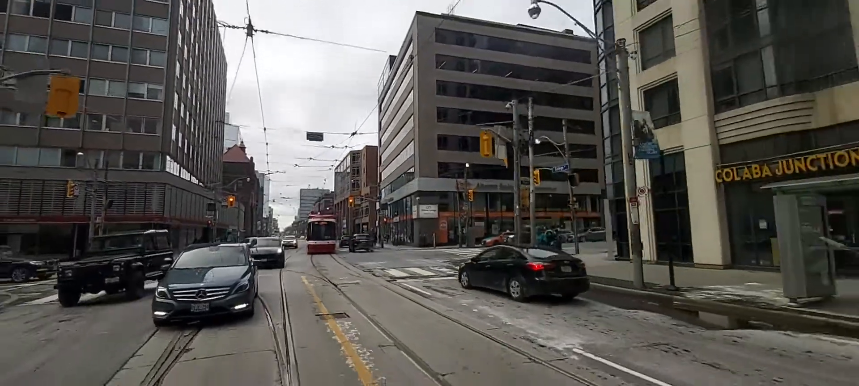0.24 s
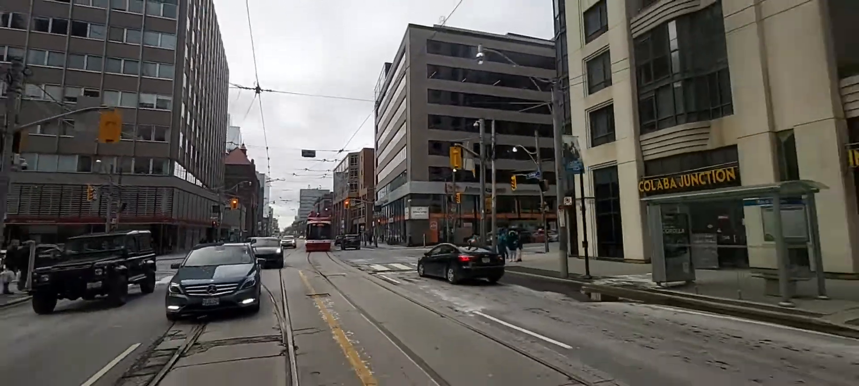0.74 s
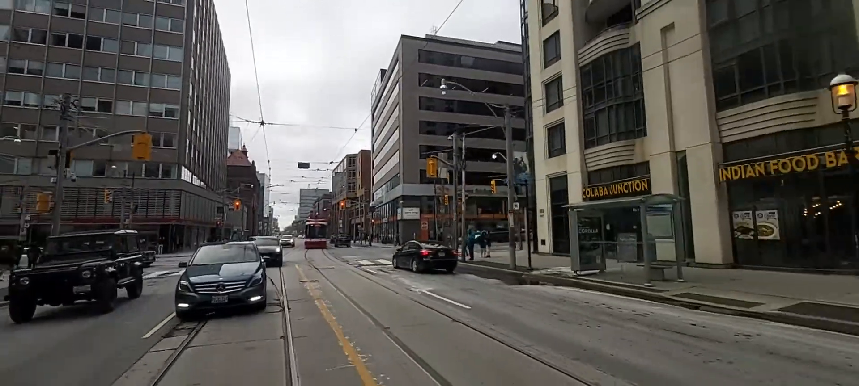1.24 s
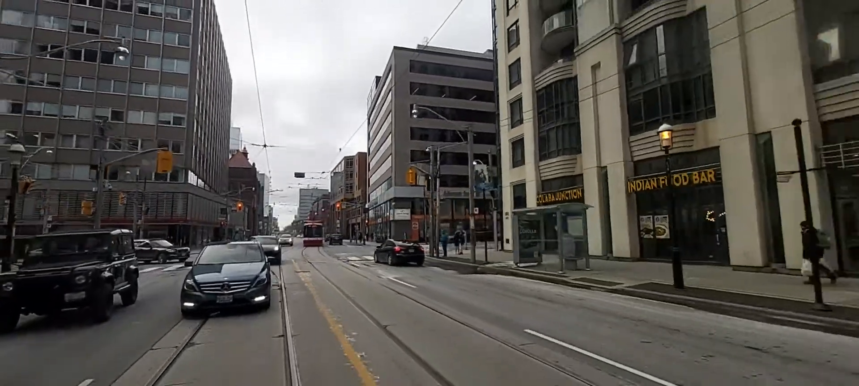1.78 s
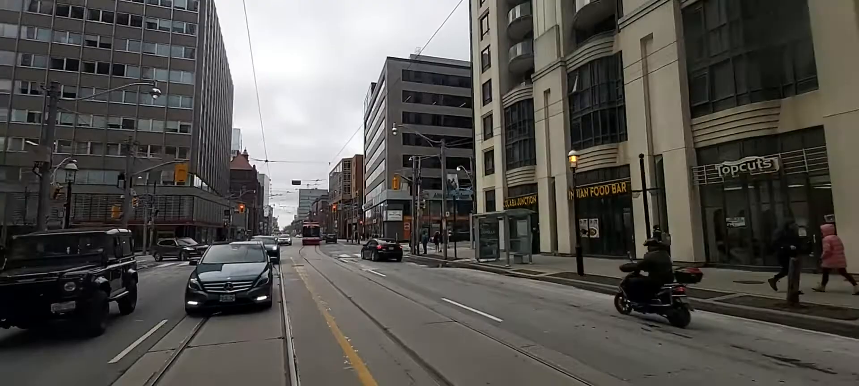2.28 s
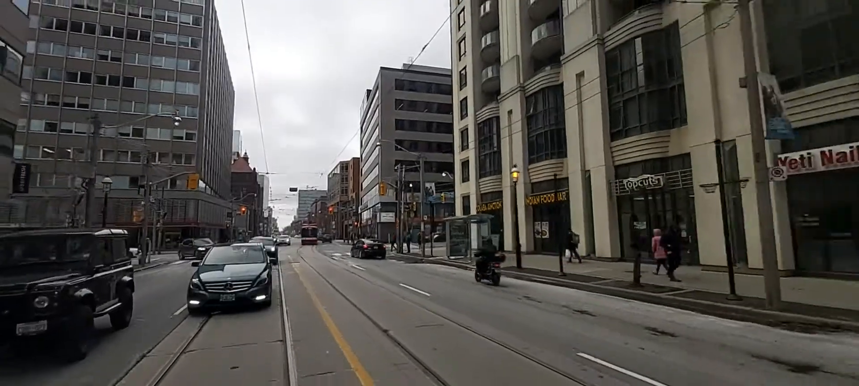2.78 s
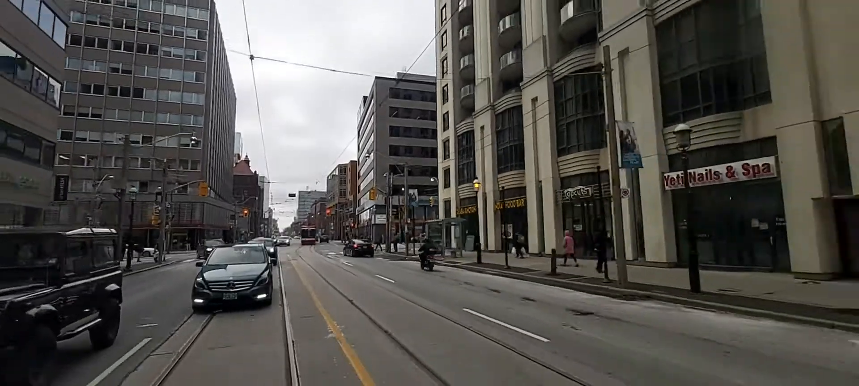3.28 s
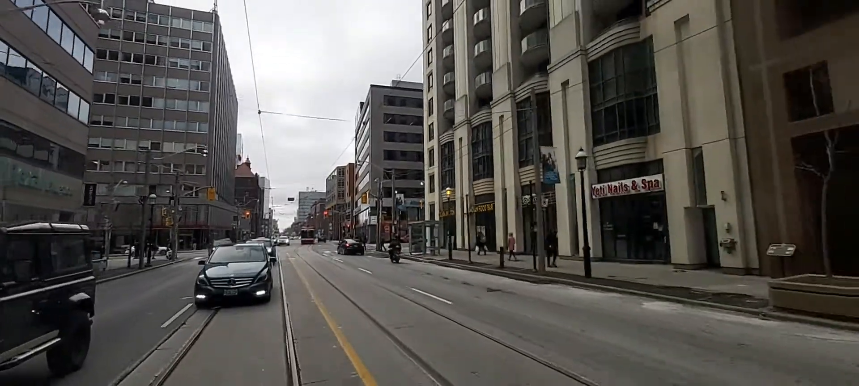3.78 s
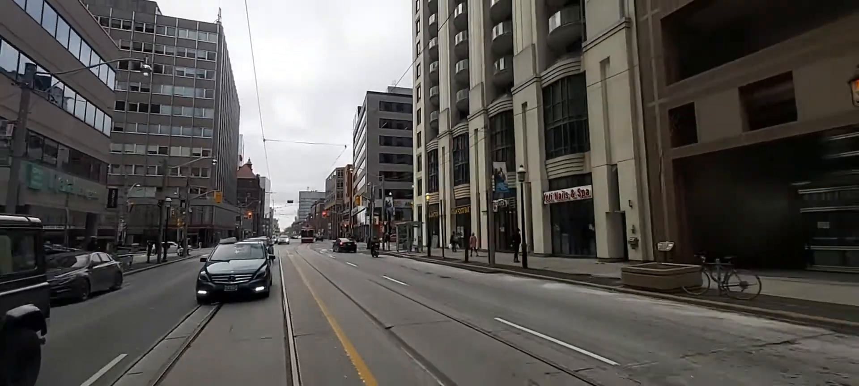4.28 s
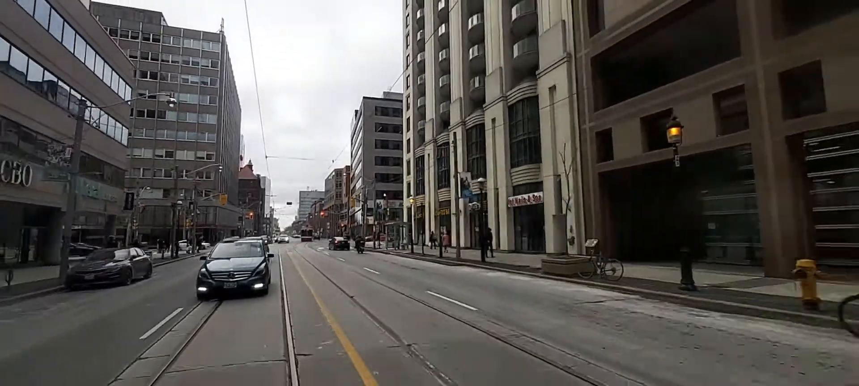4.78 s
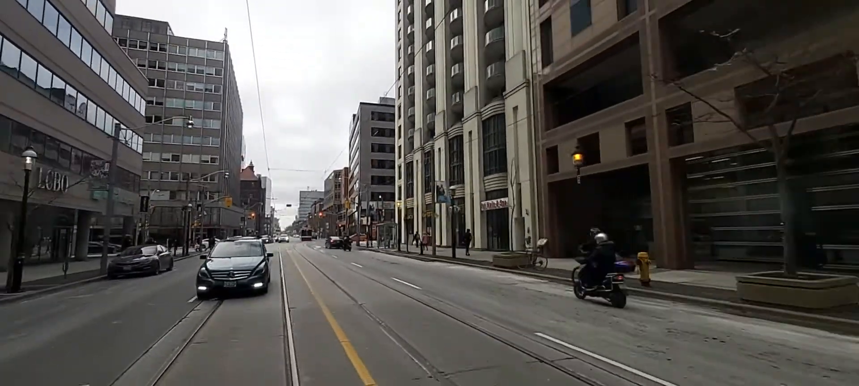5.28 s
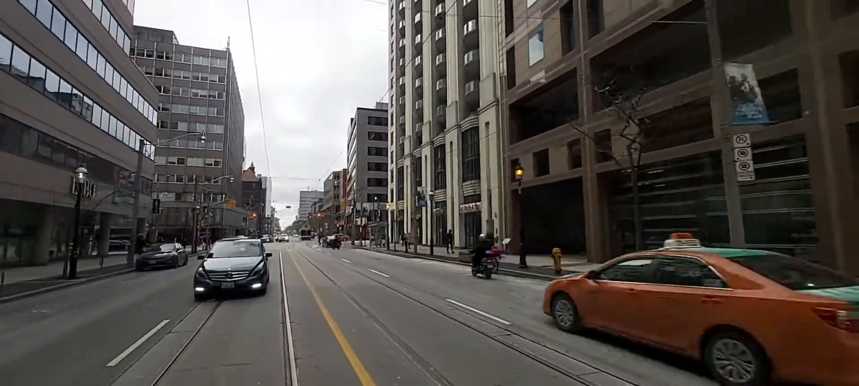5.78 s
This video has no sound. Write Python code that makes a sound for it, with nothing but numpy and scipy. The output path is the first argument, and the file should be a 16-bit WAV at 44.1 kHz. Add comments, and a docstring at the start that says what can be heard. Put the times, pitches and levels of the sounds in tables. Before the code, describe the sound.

Inside a rolling streetcar, a deep floor rumble and dull roar continue while wheels thump heavily over rail joints and loose fittings rattle.

```python
"""Inside a rolling streetcar

In the cabin, two spaced microphones: resonant noise is the bogie and floor booming with wheel-rail roughness.
Gliding tones make rail-joint thumps and bogie bounces; noise bursts make loose panels and fittings rattle.
Behind lie a banded-noise roar, swelling air hiss, a converter's tone and one faint rising wheel squeal."""
import sys
import numpy as np
from scipy import signal
from scipy.fft import next_fast_len
from scipy.io import wavfile
from scipy.ndimage import uniform_filter1d, minimum_filter1d

SR = 44100
rng = np.random.default_rng(int(sys.argv[2]) if len(sys.argv) > 2 else 0)


def materialize(psi):
    """Save the field psi as 16-bit PCM at rate SR to the path in sys.argv[1].

    A 1-D psi becomes a single channel; in a 2-D psi each row is a channel.
    """
    bounded = np.clip(np.atleast_2d(psi).T, -1, 1)
    quanta = np.round(bounded * 32767).astype(np.int16)
    wavfile.write(sys.argv[1], SR, quanta)


N = 266364   # samples

# Boom underfoot over time: [t/s, bogie level/dB, floor level/dB]
BODY_SHAKING = [(0.0, -27, -30), (0.43, -29.5, -33.5), (0.75, -32, -35.5), (0.82, -14, -26),
                (0.97, -19.5, -29), (1.24, -19.5, -29), (1.41, -30.5, -25.5), (2.02, -27, -33.5),
                (2.3, -25.5, -34.5), (2.64, -18.5, -30.5), (3.13, -23, -28), (3.55, -27.5, -31.5),
                (3.82, -18, -20), (3.99, -21.5, -21), (4.41, -27, -32.5), (4.63, -29.5, -30.5),
                (4.98, -37, -29.5), (5.43, -29, -25.5), (6.04, -35, -35)]
# Lowest bogie resonances: [f/Hz, width/Hz, relative level/dB]
BOGIE_MODES = [(37.8, 91, -10), (49.7, 29.6, -3.5), (62.7, 47.6, -0.5), (78.5, 93, -7.5)]
# Lowest floor resonances: [f/Hz, width/Hz, relative level/dB]
FLOOR_MODES = [(107.4, 15.1, -6), (129.6, 15.4, -10)]
JOINT_DIP_DB = -1


def rumble():
    """Rail roughness keeps bogie and floor ringing; the floor's share dips while a wheel crosses a joint."""
    bogie_db, floor_db = in_time(BODY_SHAKING)
    crossing = 0
    for s, _, _, rise_s, hold_s, *_ in JOINT_THUMPS:
        crossing = crossing + blow(s - .03, rise_s, t60=0.42, hold_s=hold_s + 0.026)
    floor_db = floor_db + JOINT_DIP_DB * np.minimum(crossing, 1)
    bogie = amp(bogie_db) * evened(resonant_noise(BOGIE_MODES), share=0.57)
    floor = amp(floor_db) * evened(resonant_noise(FLOOR_MODES), share=0.29)
    return bogie + floor


# Wheels over rail joints, under the floor:
# [t/s, floor level/dB, floor f/Hz, build-up/s, hold/s, panel level/dB, steel level/dB]
JOINT_THUMPS = [(0.048, -21, 107.6, 0.073, .005, -43, -70), (0.784, -9.5, 105, 0.016, 0.0055, -33, -44),
                (0.806, -5, 115, 0.02, 0.0092, -22, -39), (1.074, -9.5, 104.8, 0.024, 0.031, -23.5, -39.5),
                (1.139, -27, 109, 0.011, 0.038, -29, -44), (2.474, -16.5, 115, 0.012, 0.0065, -29.5, -36),
                (2.501, -11.5, 111, 0.017, .015, -26.5, -42), (2.532, -16, 104, 0.023, 0.0086, -41, -63),
                (2.712, -7.5, 104, 0.037, 0.0086, -32.5, -47), (2.736, -10.5, 105, 0.016, .005, -40, -39),
                (2.767, -12.5, 104, 0.018, 0.011, -29.5, -36),
                (3.218, -15.5, 104.6, 0.055, 0.014, -35, -42), (3.597, -12, 104.4, 0.012, 0.045, -49, -49),
                (3.67, -10.5, 117.5, 0.035, 0.012, -48, -59), (3.699, -15, 127, 0.015, 0.014, -25.5, -31.5),
                (3.729, -10, 135, 0.016, 0.0055, -26.5, -42), (3.841, -9, 108, 0.036, 0.013, -25.5, -40),
                (3.94, -12, 120.3, 0.021, 0.034, -28.5, -40), (3.976, -22, 108, 0.015, .005, -27, -43.5),
                (4.152, -15.5, 93.4, 0.028, 0.013, -56, -59), (5.226, -17.5, 94, 0.056, 0.009, -37, -41.5),
                (5.384, -18, 102, 0.035, 0.0058, -55, -65), (5.498, -17.5, 109, 0.056, 0.039, -41, -44),
                (5.638, -34, 95, 0.022, .005, -59, -45), (5.821, -18, 114, 0.053, 0.0061, -35.5, -41)]
# Body panel resonances: [f/Hz, width/Hz, relative level/dB]
PANEL_MODES = [(164.8, 58, 2), (230.3, 27.5, 7), (288.4, 29, 3.5), (333.6, 24, -6.5), (370, 54, -10)]
# Steel resonances: [f/Hz, width/Hz, relative level/dB]
STEEL_MODES = [(517, 71, 5), (672, 110, 8.5), (876, 140, -8), (963, 150, 5.5), (1105, 110, 11.5),
               (1243, 50, 4.5), (1455, 45, -7.5), (1630, 310, -18)]
FLOOR_SAG_HZ_PER_S, FLOOR_T60_S = -60, .085


def thumps(rail):
    """Each joint swings the floor for a few cycles, strikes panels and steel, and leaves both shuddering."""
    floor, strikes, shudder, clank = 0, 0, 0, 0
    for s, floor_level_db, hz, rise_s, hold_s, panel_db, steel_db in JOINT_THUMPS:
        push = blow(s - .015, rise_s, FLOOR_T60_S, hold_s)
        floor = floor + amp(floor_level_db) * swing(s, hz, FLOOR_SAG_HZ_PER_S, push).imag
        strikes = strikes + amp(panel_db) * struck(PANEL_MODES, s - .01, rise_s=1.15 * rise_s)
        strikes = strikes + amp(steel_db - 6.0) * struck(STEEL_MODES, s - .004, rise_s=.014)
        shudder = shudder + amp(panel_db) * blow(s - .01, rise_s=0.023, t60=0.6)
        clank = clank + amp(steel_db) * blow(s - .008, rise_s=0.013, t60=0.48)
    panels = evened(resonant_noise(PANEL_MODES), share=0.63)
    steel = evened(resonant_noise(STEEL_MODES), share=0.37)
    ringing = shudder * panels + clank * (steel + amp(-2) * rail)
    return two_ears(floor * np.sqrt(2), 0, 87) + amp(-3.0) * strikes + ringing


# Bogie bouncing on its springs, under the floor: [t/s, level/dB, starting f/Hz]
SPRING_BOUNCES = [(0.776, -23, 59.6), (0.845, -15, 56.6), (0.92, -23, 62), (1.101, -13, 52.5),
                  (1.319, -17.5, 65.1), (1.618, -20, 57.8), (2.341, -23.5, 56.8), (2.51, -14, 55.2),
                  (2.759, -15.5, 50.9), (2.999, -19, 55.5), (3.251, -23.5, 53.6), (3.358, -20, 59.1),
                  (3.719, -14.5, 53.3), (3.98, -15, 62.5), (4.359, -25, 63), (5.239, -22.5, 61.6),
                  (5.47, -19, 63.5), (5.601, -21.5, 61.2)]
BOUNCE_RISE_S, BOUNCE_T60_S, BOUNCE_CLIMB_HZ_PER_S = 0.019, 0.95, 45.7


def bounces():
    """Each bounce on the springs is a deep swing that climbs in pitch as it settles."""
    heave = 0
    for s, level_db, hz in SPRING_BOUNCES:
        envelope = blow(s, BOUNCE_RISE_S, BOUNCE_T60_S)
        heave = heave + amp(level_db) * swing(s, hz, BOUNCE_CLIMB_HZ_PER_S, envelope, turn=rng.random())
    heave = heave * np.sqrt(2)
    return two_ears(heave.imag, heave.real, 85)


# Loose fittings knocking in the cabin: [t/s, knock and clatter level/dB, top sizzle level/dB, build-up/s]
FITTING_KNOCKS = [(0.0194, -43, -71, .003), (0.3022, -37.5, -72, 0.0027), (0.35, -41, -65, .012),
                  (0.7901, -31, -66, 0.0097), (0.848, -32.5, -56, 0.0041), (0.919, -36, -79, 0.0027),
                  (1.049, -36.5, -68, .006), (1.0984, -35, -69, 0.0094), (1.145, -27.5, -47.5, 0.0031),
                  (1.2181, -35, -64, 0.0025), (1.245, -43, -56, .008), (1.271, -33.5, -54, .002),
                  (1.295, -48, -61, .008), (1.348, -40.5, -75, .003), (1.6844, -38, -56, 0.0057),
                  (1.95, -44, -60, 0.011), (2.0701, -37, -73, .015), (2.2437, -34.5, -69, 0.0043),
                  (2.2578, -48, -59, .006), (2.3542, -43, -55, 0.011), (2.3695, -46, -70, .003),
                  (2.489, -32, -57, .002), (2.551, -27.5, -49.5, 0.0018), (2.763, -35, -57, 0.0043),
                  (2.776, -34.5, -58, 0.0027), (2.791, -38, -62, 0.0029), (2.85, -44, -77, 0.01),
                  (3.08, -39.5, -61, .01), (3.117, -39, -60, 0.0052), (3.3005, -39, -67.5, 0.0074),
                  (3.5625, -39.5, -61, 0.0037), (3.741, -34.5, -58, .003), (3.815, -34.5, -59.5, 0.0055),
                  (3.8815, -35.5, -56, 0.004), (3.905, -54, -62, .008), (3.9924, -34, -61.5, 0.0039),
                  (4.0461, -38, -65, .003), (4.094, -57, -66, 0.0022), (5.475, -32, -61, 0.0045),
                  (5.609, -31.5, -54, 0.0049), (5.63, -44, -59, 0.0075), (5.7476, -39, -67, 0.0055)]
# First ring of a knock: [f/Hz, width/Hz, relative level/dB]
TICK_MODES = [(2450, 640, -0.5), (3320, 240, -9.5), (4800, 550, -2), (6460, 940, 1), (7600, 900, -7.5)]
# Clatter spectrum: [f/Hz, relative level per Hz/dB]
CLATTER_SPECTRUM = [(600, -20.5), (1200, 1.5), (1900, -9.5), (3000, -15.5), (6000, -10.5), (10000, -26)]
# Resonances of the fittings: [f/Hz, width/Hz, relative level/dB]
FITTING_MODES = [(2370, 270, -7), (2620, 1030, 11), (3470, 640, 8), (4720, 690, 6), (6070, 1100, -5),
                 (6930, 770, -6.5)]
# Spectrum of the sizzling top: [f/Hz, relative level per Hz/dB]
SIZZLE_SPECTRUM = [(6000, -33), (9000, 4), (12000, 0.5), (15900, -20)]
CLATTER_T60_S, SIZZLE_T60_S = 0.28, 0.25
SHARP_S = 0.003   # knocks that build up more slowly have a weaker first crack


def rattles():
    """A short metallic tick, then a ragged clatter of small contacts dying in the cabin."""
    knock, clatter, top = 0, 0, 0
    for s, level_db, top_db, rise_s in FITTING_KNOCKS:
        crack = min(1, SHARP_S / rise_s)
        tick = blow(s - .0005, rise_s=0.0014, t60=0.017, hold_s=0.0016)
        knock = knock + crack * amp(level_db) * tick
        clatter = clatter + amp(level_db) * blow(s, rise_s, CLATTER_T60_S)
        first_sizzle = crack * blow(s - .0005, rise_s=0.00091, t60=0.03)
        sizzle_tail = amp(-3.0) * blow(s, rise_s, SIZZLE_T60_S)
        top = top + amp(top_db) * (first_sizzle + sizzle_tail)
    ragged = amp(1.6 * drift(70) + .6 * drift(20))
    tail = amp(-12.5) * banded_noise(CLATTER_SPECTRUM) + amp(-9.5) * resonant_noise(FITTING_MODES)
    ticks = amp(-7.5) * knock * resonant_noise(TICK_MODES)
    return ticks + ragged * (clatter * tail + top * banded_noise(SIZZLE_SPECTRUM))


# Rolling bed over time: [t/s, roar level/dB, cabin ringing level/dB]
ROLLING_LEVELS = [(0.0, -29, -39.5), (0.4, -28, -32.5), (0.99, -27, -33.5), (1.85, -28, -34),
                  (2.6, -25.5, -34.5), (3.55, -29.5, -31), (3.87, -28.5, -34.5), (4.12, -30, -34.5),
                  (4.8, -28, -35), (5.5, -25.5, -34), (6.04, -26, -31.5)]
# Spectrum of the rolling roar: [f/Hz, relative level per Hz/dB]
ROAR_SPECTRUM = [(28, -27), (45, -11), (120, -7), (170, -10), (280, -8), (400, -15.5), (670, -20),
                 (900, -25), (1150, -23.5), (1800, -37.5), (2300, -33), (3300, -39.5), (4100, -51.5),
                 (5200, -52.5), (8000, -59.5), (15900, -86)]
# Cabin ringing under the roar: [f/Hz, width/Hz, relative level/dB]
CABIN_MODES = [(221, 23, -4), (283.8, 11.7, -4), (337.9, 18.5, -6), (665, 68, -11.5), (2107, 450, -19.5),
               (3480, 320, -29), (4756, 370, -30), (7000, 450, -43)]


def roar(rail):
    """Broad rolling noise of wheel on rail, with the cabin's resonances ringing under it."""
    roar_db, cabin_db = in_time(ROLLING_LEVELS)
    return amp(roar_db) * rail + amp(cabin_db) * resonant_noise(CABIN_MODES)


# Air hiss over time: [t/s, level/dB]
AIR_LEVELS = [(0, -53.5), (.12, -65.5), (.57, -63), (.61, -53), (1.3, -59), (1.55, -67), (2.2, -69),
              (2.5, -58.5), (2.9, -61), (3.1, -71.5), (3.8, -60), (4.05, -58.5), (4.15, -72), (4.85, -78),
              (5.0, -60.5), (5.3, -70), (5.43, -53.5), (5.75, -58), (6.04, -40.5)]
# Spectrum of the air hiss: [f/Hz, relative level per Hz/dB]
HISS_SPECTRUM = [(2500, -3), (4000, -3.5), (8000, -6.5), (12000, -7.5), (15900, -21.5)]


def air_hiss():
    """Air is a bright band of noise that swells now and then."""
    level_db, = in_time(AIR_LEVELS)
    return amp(level_db) * banded_noise(HISS_SPECTRUM)


# Swells of the wheel squeal: [start t/s, loudest t/s, end t/s, level/dB]
SQUEAL_SWELLS = [(0.41, 0.475, 0.65, -50), (0.63, 0.7, 0.75, -52), (0.72, 0.768, 0.825, -49.5)]
SQUEAL_HZ, SQUEAL_CLIMB_HZ_PER_S = 3465, 470   # pitch at the first start, and its rise


def squeal():
    """A thin, rising whistle of wheel on rail."""
    t = np.arange(N) / SR
    swell = 0
    for s, top_s, end_s, level_db in SQUEAL_SWELLS:
        ramp = np.interp(t, [s, top_s, end_s], [0, 1, 0])
        swell = swell + amp(level_db) * np.sin(np.pi / 2 * ramp) ** 2
    hz = SQUEAL_HZ + SQUEAL_CLIMB_HZ_PER_S * (t - SQUEAL_SWELLS[0][0])
    phase = 2 * np.pi * np.cumsum(hz + 8 * drift(15)) / SR
    return swell * amp(2.2 * drift(25)) * np.sin([phase, phase + 0.77])


# Converter tone, faint in the background: [f/Hz, level/dB]
CONVERTER_HUM = [(951.5, -51.5)]


def hum():
    """Converter tone, nearly steady in pitch, that swells and fades."""
    (hz, level_db), = CONVERTER_HUM
    wander_hz, waver_db = 1.2 * drift(4), 2.8 * drift(7)
    phase = 2 * np.pi * np.cumsum(hz + wander_hz) / SR
    return amp(level_db + waver_db) * np.sqrt(2) * np.sin([phase, phase + 1.2])


def swing(at_s, hz, climb_hz_per_s, envelope, turn=0):
    """Complex tone under an envelope, gliding in pitch and passing hz at at_s."""
    out, on = np.zeros(N, complex), np.flatnonzero(envelope)
    t = on / SR - at_s
    cycles = hz * t + climb_hz_per_s * t ** 2 / 2 + turn
    out[on] = envelope[on] * np.exp(2j * np.pi * cycles)
    return out


def struck(modes, at_s, rise_s):
    """Every mode swells during the blow and rings out, with fresh strength and phase."""
    t, out = np.arange(N) / SR, np.zeros((2, N))
    near = slice(int(at_s * SR), int((at_s + .4) * SR))
    for hz, width_hz, level_db in modes:
        luck, turn, lean = rng.random(3)
        phase = 2 * np.pi * (hz * t[near] + turn)
        t60 = np.log(1000) / (np.pi * width_hz)   # a narrower mode rings longer
        wave = two_ears(np.sin(phase), np.sin(phase + 2 * np.pi * lean), hz)
        out[:, near] += amp(level_db + 6.0 * (luck + 0.5)) * blow(at_s, rise_s, t60)[near] * wave
    return out


def blow(at_s, rise_s, t60, hold_s=0):
    """Envelope that builds up smoothly, holds, then dies away by 60 dB in t60 seconds."""
    out, first, top_s = np.zeros(N), max(int(at_s * SR), 0), rise_s + max(hold_s, 0)
    last = min(N, first + int((top_s + 1.5 * t60) * SR))
    t = np.arange(first, last) / SR - at_s
    build_up = np.sin(np.pi / 2 * np.clip(t / rise_s, 0, 1)) ** 2
    out[first:first + len(t)] = build_up * amp(-60 * np.maximum(t - top_s, 0) / t60)
    return out


def resonant_noise(modes):
    """Stereo noise through parallel resonances, each applied twice for steep skirts; rms 1."""
    out, settle = 0, SR // 2
    for hz, width_hz, level_db in modes:
        r = np.exp(-np.pi * width_hz / SR)
        section = [1, 0, -1, 1, -2 * r * np.cos(2 * np.pi * hz / SR), r * r]
        noise = rng.standard_normal((2, N + settle))
        mid, side = signal.sosfilt([section, section], noise)[:, settle:]
        out = out + amp(level_db) * two_ears(rms_one(mid), rms_one(side), hz)
    return rms_one(out)


def banded_noise(spectrum, flicker_db=.7):
    """Third-octave bands of stereo noise, each with its own level and flicker; rms 1."""
    out, together, edges = 0, drift(3), 26 * 2 ** (np.arange(29) / 3)
    white = rng.standard_normal((2, 2, N))   # neighbouring bands take different noise
    for k, (low, high) in enumerate(zip(edges, edges[1:])):
        hz = np.sqrt(low * high)
        if spectrum[0][0] < hz < spectrum[-1][0]:
            band = signal.butter(2, [low, high], "band", fs=SR, output="sos")
            mid, side = signal.sosfilt(band, white[k % 2])
            flicker = flicker_db * (together + drift(12))
            out = out + amp(at_hz(spectrum, hz) + flicker) * two_ears(mid, side, hz)
    return rms_one(out)


def evened(x, share):
    """Part of the chance swell of a narrow noise is divided out; rms 1."""
    swell = np.abs(signal.hilbert(x.mean(axis=0), next_fast_len(N))[:N])
    return rms_one(x / (swell + 1.8) ** np.clip(share, 0, 1))


# Likeness of the two spaced microphones: [f/Hz, left-right correlation]
MIC_LIKENESS = [(60, .985), (215, .965), (300, .88), (470, .74), (650, .58), (730, .3), (820, -.45),
                (1160, -.35), (1420, .25), (1650, 0), (15000, 0)]
# Balance of the two microphones: [f/Hz, left over right level/dB]
MIC_BALANCE = [(60, -1), (300, -1.5), (650, 1.5), (820, -2), (990, 4.5), (1300, -2), (1700, -11),
               (2000, -2.5), (2600, -9.5), (3400, -5.5), (4200, 4), (5300, -4.5), (8000, 0), (15000, -0.5)]


def two_ears(mid, side, hz):
    """Left and right microphone at one frequency, from a shared and an opposed part."""
    sign = np.array([[1], [-1]])
    alike = np.clip(at_hz(MIC_LIKENESS, hz), -1, 1)
    pan = amp(at_hz(MIC_BALANCE, hz) / 2 * sign)
    return pan * (np.sqrt(1 + alike) * mid + np.sqrt(1 - alike) * side * sign) / np.sqrt(2)


def drift(rate_hz):
    """Slow random wander around zero, rms about 1, drawn at every 40th sample."""
    r = np.exp(-80 * np.pi * rate_hz / SR)
    noise = rng.standard_normal(N // 40 + 2002)
    slow = signal.lfilter([1], [1, -2 * r, r * r], noise)[2000:]   # drop the filter's start
    return np.interp(np.arange(N) / 40, np.arange(len(slow)), rms_one(slow))


def in_time(rows):
    """Each column of a curve at every sample."""
    s, *columns = np.transpose(rows)
    return [np.interp(np.arange(N) / SR, s, c) for c in columns]


def at_hz(points, hz):
    """Read a table on a log-frequency axis."""
    table_hz, values = np.array(points).T
    return np.interp(np.log(hz), np.log(table_hz), values)


def amp(db):
    """dB to gain."""
    return 10 ** (np.asarray(db) / 20)


def rms_one(x):
    """Scale to rms 1."""
    return x / np.sqrt(np.mean(x ** 2) + 1e-20)


def scene():
    """All sources as heard in the cabin; the roar and the joint clanks share one rail noise."""
    rail = banded_noise(ROAR_SPECTRUM, flicker_db=1.0)
    jolts = thumps(rail) + bounces() + rattles()
    return rumble() + jolts + roar(rail) + air_hiss() + squeal() + hum()


LIMIT = .88   # of full scale
BASS_CUT_HZ, TOP_CUT_HZ = 31, 15750


def record(dry):
    """The deepest bass is lost, a limiter ducks the loudest moments, the top is cut."""
    bass_cut = signal.sosfilt(signal.butter(3, BASS_CUT_HZ, "high", fs=SR, output="sos"), dry)
    wanted = np.minimum(1, LIMIT / (np.abs(bass_cut).max(axis=0) + 1e-9))
    gain = uniform_filter1d(minimum_filter1d(wanted, size=881), size=881)   # eases in and out over 20 ms
    top_cut = signal.ellip(10, .5, 70, TOP_CUT_HZ, fs=SR, output="sos")
    return signal.sosfilt(top_cut, gain * bass_cut)


dry = scene()
out = record(dry)
materialize(out)
```